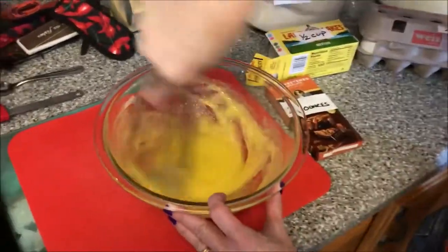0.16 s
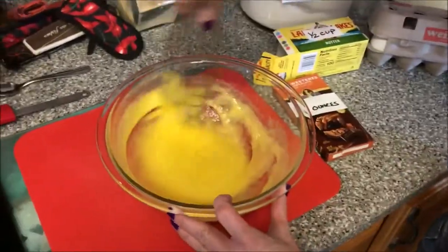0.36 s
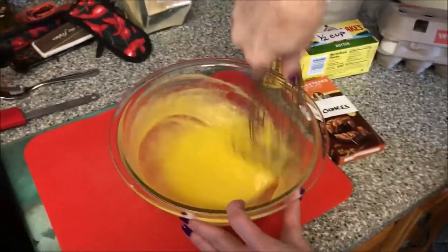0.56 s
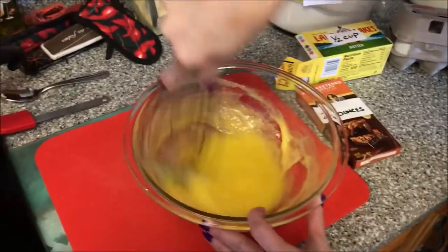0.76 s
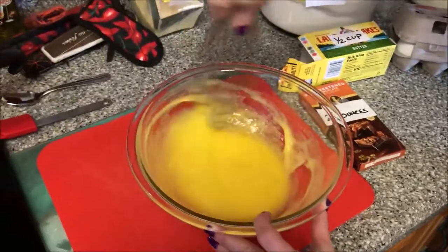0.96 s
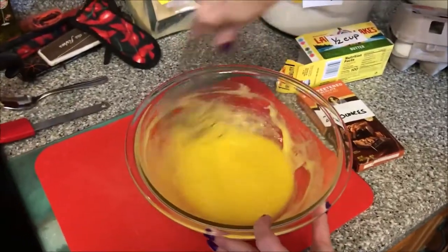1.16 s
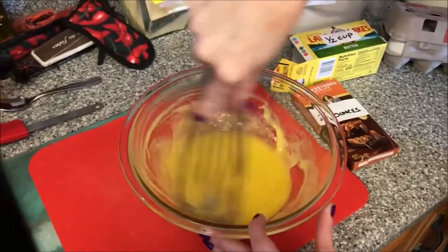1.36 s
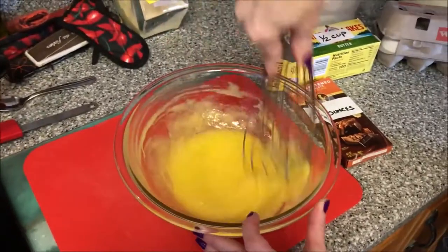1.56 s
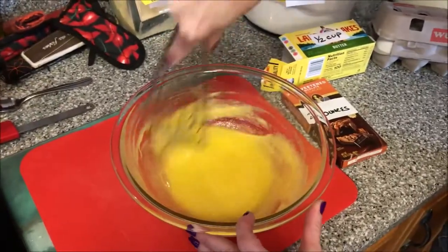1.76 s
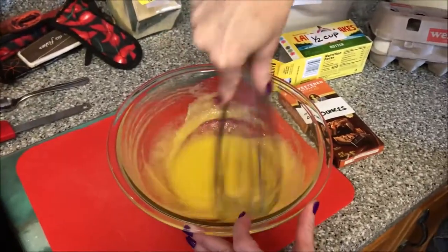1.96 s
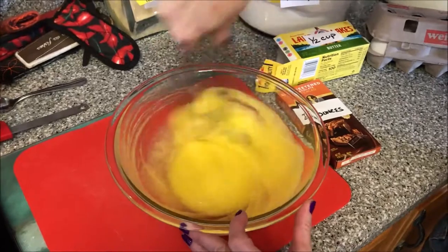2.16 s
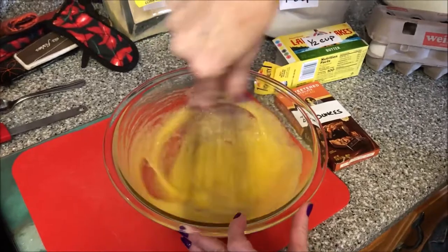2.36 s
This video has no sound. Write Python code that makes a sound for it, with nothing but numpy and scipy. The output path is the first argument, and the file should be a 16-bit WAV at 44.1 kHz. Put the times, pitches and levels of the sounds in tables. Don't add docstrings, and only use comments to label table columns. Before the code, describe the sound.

Fast whisking in a glass bowl: bright wire clinks and gritty scraping in a quiet kitchen

```python
import sys
import numpy as np
from scipy import signal
from scipy.fft import rfft, irfft
from scipy.io import wavfile
from scipy.ndimage import uniform_filter1d

SR = 44100
rng = np.random.default_rng(int(sys.argv[2]) if len(sys.argv) > 2 else 0)


def gain_from_db(level_db):
    decades = np.asarray(level_db, float) / 20
    return 10 ** decades


def unload_audio(sound):
    columns = np.transpose(np.atleast_2d(sound))
    steps = np.round(np.clip(columns, -1, 1) * 32767)
    wavfile.write(sys.argv[1], SR, steps.astype(np.int16))


N = 105840

# start_s, peak_db, then mode2_db, mode3_db, mode4_db relative to the peak
SQUARE_STRIKES = [(0.047, -27, -43, -28, -37), (0.2372, -1.5, -19.5, -20.5, -3),
                  (0.399, -22, -25.5, -18, -22), (0.5307, -10.5, -30, -10, -18.5),
                  (0.5495, -13, -29, -11, -20), (0.7209, -16.5, -28, -38, -12.5),
                  (0.9242, -18, -20, -14, -8.5), (1.0111, -26.5, -10.5, -17, -5.5),
                  (1.2012, -21, -22, -21.5, -22), (1.4743, -25.5, -20, -16, -41),
                  (1.6204, -20.5, -31, -18, -14), (1.6647, -16, -22.5, -24, -14),
                  (1.921, -25.5, -18, -41, -14), (1.9565, -26, -23, -19, -21),
                  (2.016, -27.5, -35, -40, -28), (2.1216, -25, -40, -21, -26),
                  (2.3498, -22.5, -46, -41, -31)]
GLANCING_STRIKES = [(0.07, -28, -56, -46, -27), (0.1507, -23, -27, -46, -26), (0.1764, -25.5, -17.5, -47, -18),
                    (0.4569, -31.5, -15, -20, -26), (0.506, -23, -28, -17.5, -27),
                    (0.6514, -42, -22, -21, -22), (0.6846, -21, -22, -52, -20), (0.7582, -17.5, -16, -51, -10),
                    (0.782, -12.5, -12.5, -20.5, -8), (0.841, -18.5, -17, -30, -5.5),
                    (0.8824, -23.5, -18.5, -14.5, -9), (0.9597, -26, -11, -56, -19.5),
                    (0.9844, -62, -60, -60, -1), (1.05, -30.5, -16, -11, -6), (1.0684, -26, -13.5, -20, -7),
                    (1.0949, -19.5, -16, -20, -16), (1.1608, -24.5, -17, -20, -15),
                    (1.232, -21, -22.5, -17.5, -16), (1.2657, -17.5, -16.5, -19, -17.5),
                (1.349, -26, -33, -15, -20), (1.3746, -22.5, -21, -24, -10.5),
                (1.3904, -27.5, -39, -4.5, -23), (1.415, -24, -36, -21, -11), (1.525, -33, -11, -34, -7),
                (1.585, -25, -28, -34, -48), (1.6902, -19, -21, -20.5, -12),
                (1.741, -23.5, -15.5, -19, -19), (1.8466, -35.5, -37, -45, -8), (1.872, -20, -43, -41, -21),
                (2.044, -24, -30, -45, -37), (2.141, -19, -53, -47, -54), (2.1705, -30.5, -17, -30, -36),
                (2.2548, -33.5, -14, -10.5, -28)]
# pitch_hz, struck_db, scraped_db, t60_s, pair_split_hz
BOWL_MODES = [(538, -37, -13.5, 0.47, 19.5), (1413.5, 2.5, -8, 0.2, 21.5), (2627, 2, -12.5, 0.21, 35.5),
              (4057, 2, -6.5, 0.091, -58.5), (3054, -22, -15, 0.12, 64), (3556, -22.5, -12, 0.073, 67),
              (5718, -16.5, -7.5, 0.083, 49.5),
              (7450, -19, -14, .05, 70), (8140, -19, -14, .06, 40), (8690, -22, -15, .05, 60),
               (9455, -16, -11, .06, 50), (11440, -21, -19, .03, 100)]
# time_s, level_db
BARE_GLASS = [(0, -3), (.6, 1), (.8, 0.5), (1.4, 3), (1.9, 2.5), (2.1, -4), (2.4, -2)]
# time_s, level_db
PRESSURE = [(0.0, -39.5), (0.58, -41.5), (0.75, -33), (0.87, -38), (1.28, -43.5), (1.44, -41),
            (1.65, -38.5), (1.78, -39), (2.11, -39), (2.22, -33.5), (2.29, -38.5), (2.4, -35)]
# frequency_hz, density_db (per Hz)
TICK_COLOUR = [(70, -30), (250, -15), (600, -6), (1200, 0.5), (2000, -5), (3300, 0), (7000, -4),
               (11000, -5.5), (16000, -9)]
# pitch_hz, level_db, t60_s
WIRE_MODES = [(1204, -10, 0.026), (3320, 4, 0.042), (5470, -2.5, .025), (7000, 8, 0.045),
              (9250, -0.5, 0.013)]
# time_s, level_db
SKIM_LEVEL = [(0, -63), (.08, -56.5), (.16, -42), (.23, -39.5), (.35, -67.5), (1.9, -58), (2.1, -50.5),
              (2.4, -55)]
# start_s, pitch_hz, peak_db, decay_s
PINGS = [(.0485, 3690, -33, 0.0033), (0.049, 4900, -38, .002), (0.0497, 8070, -31, .002),
         (.2225, 5800, -32.5, 0.0045), (.2235, 7460, -40, 0.0031), (.2235, 3000, -42, 0.0037),
         (.222, 12800, -40, .005), (.244, 4046, -9, 0.0073), (0.238, 2960, -19, 0.0035),
         (0.248, 9400, -27, 0.0042), (.239, 2020, -34, 0.0048), (0.297, 9150, -43, .01),
         (.297, 5760, -40, 0.01), (.295, 7480, -46, 0.065), (0.313, 9400, -36.5, 0.01),
         (0.296, 3175, -51, 0.018), (0.294, 1257, -46, 0.022), (.5495, 8120, -23, .005),
         (.532, 5380, -23, .005), (.5495, 3500, -23.5, .004), (.532, 3900, -19, 0.0038),
         (0.7186, 5710, -30.5, 0.014), (1.0111, 11400, -33.5, .004), (1.0111, 6600, -37, .003),
         (1.318, 2900, -39.5, 0.014), (1.318, 3620, -38, 0.013), (1.335, 3240, -41, 0.014),
         (1.342, 8740, -32, 0.0091), (1.342, 7450, -37, .008), (1.374, 5710, -34, 0.038),
         (1.376, 2035, -40, 0.021), (1.375, 3030, -41, .03), (1.376, 3420, -48, 0.027),
         (1.379, 8180, -42, 0.033), (1.382, 9450, -31, 0.018), (1.521, 3070, -38, 0.02),
         (1.6656, 8150, -31.5, 0.013), (1.781, 4070, -44, 0.076), (1.623, 2615, -38.5, .04),
         (1.69, 5710, -34, 0.028), (2.351, 9000, -41, .003)]
# start_s, pitch_hz, peak_db, decay_s
KNOCKS = [(0.337, 129, -36.5, 0.015), (.34, 81.5, -39.5, 0.0204), (.24, 149, -40.5, .015),
          (0.529, 218, -45, 0.025), (1.375, 828, -44, 0.034), (1.38, 1075, -35.5, 0.023),
          (1.517, 848, -41, 0.018), (1.922, 1117, -37, 0.015), (1.957, 1110, -38, 0.0096),
          (2.016, 1160, -35.5, 0.0052), (2.045, 1555, -33.5, 0.0055), (2.349, 5200, -30.5, 0.0032),
          (2.144, 7250, -33, 0.0043)]
# centre_s, length_s, depth_db
LIFTS = [(0.375, .03, -2), (0.619, 0.044, -7.5), (2.7, 0.037, -10), (2.325, 0.032, -7), (1.57, 0.014, -2)]
# centre_s, length_s, depth_db
BRIEF_DIPS = [(.31, .03, -34), (1.334, .026, -34), (.105, .022, -12), (.217, .02, -16), (.876, .016, -14),
              (1.025, .018, -11), (1.537, .014, -12), (.172, .012, -10), (1.389, .01, -12),
              (.2325, .006, -14), (.683, .014, -9), (1.153, .014, -9)]
# frequency_hz, density_db (per Hz)
ROOM_COLOUR = [(33, -40), (40, -18), (54, -1.5), (291, 1), (319, -24), (492, -7), (531, -44), (592, 0.5),
               (1000, -22), (1300, -43), (2200, -120)]

WIRES = 5
HELD_TOP_HZ = 9800


def curve(table):
    a = np.array(table)
    return np.interp(np.arange(N) / SR, a[:, 0], a[:, 1])


def unit(x):
    return x / np.sqrt(np.mean(x ** 2))


def spectrum_db(hz, table):
    a = np.array(table)
    return np.interp(np.log(hz), np.log(a[:, 0]), a[:, 1])


def colour(x, table):
    hz = np.arange(N // 2 + 1) * SR / N + 1
    return unit(irfft(rfft(x) * gain_from_db(spectrum_db(hz, table)), N))


def fade(x, tau, hz=0):
    return signal.lfilter([1], [1, -np.exp(2j * np.pi * hz / SR - 1 / (tau * SR))], x)


def walk(rate):
    k = int(SR / rate)
    steps = np.repeat(rng.standard_normal(N // k + 1), k)
    return unit(uniform_filter1d(steps, k)[:N])


def impulses(times, sizes):
    x = np.zeros(N, complex)
    np.add.at(x, np.clip((times * SR).astype(int), 0, N - 1), sizes)
    return x


def dip_db(centre_s, length_s, depth_db):
    t = np.arange(N) / SR
    return depth_db * np.exp(-((t - centre_s) / length_s * 2) ** 4)


def wires(table, spread_s, early_s, fall_db):
    hits = np.repeat(np.array(table, float), WIRES, axis=0)
    luck = rng.random((len(table), WIRES, 2))
    turn = np.arange(WIRES)
    jitter = np.sign(turn) * (luck[..., 0] - .5)
    hits[:, 0] += (spread_s * (turn + jitter) / WIRES).ravel() - early_s
    hits[:, 1] += (4 * luck[..., 1] - 8 + fall_db * turn).ravel()
    return hits


def bowl(hits, grit):
    rise_s, struck_damp, linger_db, scatter_db = 0.0012, 0.61, -17, 2.5
    modes = BOWL_MODES
    struck, scraped = 0, 0
    luck = rng.random((len(hits), len(modes), 3))
    luck[..., 0] = np.repeat(luck[::WIRES, :, 0], WIRES, axis=0)
    start, peak_db = hits[:, 0], hits[:, 1]
    glass_db = curve(BARE_GLASS)
    bare_db = glass_db[(start * SR).astype(int)]
    for k, (hz, hit_db, scrape_db, t60, split_hz) in enumerate(modes):
        if 1 <= k <= 3:
            place_db = hits[:, k + 1]
        else:
            place_db = scatter_db * (4 * luck[:, k, 0] - 2) + bare_db
        if k == 6:
            place_db = .5 * (place_db + hits[:, 4] + 14)
        phase = 2.5 * luck[:, k, 1] + 2 * np.pi * (hz * start + luck[:, k, 0])
        size = gain_from_db(peak_db + place_db + hit_db) * np.exp(1j * phase)
        tau = t60 / np.log(1000)
        weak_share = 0.14 * np.exp(1.5j * (luck[:, k, 2] - .5))
        for side, share in ((-.5, 0.5), (.5, weak_share)):
            f = hz + side * split_hz
            push = fade(impulses(start, size * share), rise_s, f) / (rise_s * SR)
            ring = fade(push, tau * struck_damp, f) + gain_from_db(linger_db) * fade(push, tau * 2, f)
            struck = struck + ring.imag
            flicker_db = 2.9 * walk(25.03) if k < 4 else 4.5 * walk(30.18) + glass_db
            fed = fade(grit * gain_from_db(flicker_db), tau, f).imag
            scraped = scraped + gain_from_db(scrape_db) * unit(fed)
    return struck, unit(scraped)


def cracks(hits):
    crack_db, crack_s, tail_db, tail_s = -13.5, 0.0015, -12.5, 0.03
    x = fade(impulses(hits[:, 0], gain_from_db(hits[:, 1] + crack_db)), 0.00045) / (0.00065 * SR)
    env = (fade(x, crack_s) + gain_from_db(tail_db) * fade(x, tail_s)).real
    return env * colour(rng.standard_normal(N), TICK_COLOUR)


def drag():
    ticks_per_s, spread_db, smear_s = 600, 2.2, 0.0018
    ticks = (rng.random(N) < ticks_per_s / SR) * gain_from_db(spread_db * rng.exponential(size=N))
    grit = fade(ticks, smear_s).real * rng.standard_normal(N)
    return unit(grit * gain_from_db(2 * walk(40) + 1 * walk(12)))


def patchy(x):
    spec, out = rfft(x), 0
    hz = np.arange(len(spec)) * SR / N
    band = np.log2(hz / 700 + 1e-3).clip(0, 4.5) * 4
    for k in range(19):
        weight = (1 - abs(band - k)).clip(0)
        out = out + irfft(spec * weight, N) * gain_from_db(2.8 * walk(60))
    return out


def rattle():
    clicks_per_s, ring_cycles = 240, 5.4
    out, pitches = 0, np.geomspace(1000, 10500, num=16)
    for hz in pitches:
        clicks = rng.random(N) < clicks_per_s / len(pitches) / SR
        x = clicks * gain_from_db(2 * rng.exponential(size=N))
        out = out + fade(x, ring_cycles / hz, hz).imag * gain_from_db(spectrum_db(hz, TICK_COLOUR))
    return unit(out)


def skim(grit):
    hum = 0
    for hz, db, t60 in WIRE_MODES:
        hum = hum + gain_from_db(db) * unit(fade(grit, t60 / np.log(1000), hz).imag)
    return gain_from_db(curve(SKIM_LEVEL)) * unit(hum)


def knocks():
    t, out = np.arange(N) / SR, 0
    for start, hz, db, tau in KNOCKS + PINGS:
        since = t - start
        rise = np.clip(since / max(2 / hz, 0.2 * tau), 0, 1)
        decay = np.exp(-np.clip(since, 0, 9) / tau)
        out = out + gain_from_db(db) * np.sin(2 * np.pi * hz * since) * decay * rise
    return out


def held(x):
    count, frame, level_db = 9, 1024, 5.5
    t, out = np.arange(N) / SR, 0
    for centre, length, depth_db in BRIEF_DIPS:
        end = int((centre - length / 2) * SR)
        size = abs(rfft(x[end - frame:end] * np.hanning(frame))) * 4 / frame
        hz = np.arange(len(size)) * SR / frame
        tilt = size * np.sqrt(hz) * (hz < HELD_TOP_HZ)
        tops = signal.find_peaks(tilt, distance=9)[0]
        tops = tops[np.argsort(-tilt[tops])[:count]]
        tones = sum(size[k] * np.sin(2 * np.pi * hz[k] * t + k) for k in tops)
        out = out + (1 - gain_from_db(dip_db(centre, length, depth_db))) * tones
    return out * gain_from_db(level_db)


def room():
    room_db, hum_hz, hum_db = -55.5, 59.7, -58.5
    phase = 2 * np.pi * hum_hz * np.arange(N) / SR + 1.5 * walk(18)
    hum = np.sin(phase) * gain_from_db(hum_db + 2.5 * walk(14))
    air = colour(rng.standard_normal(N), ROOM_COLOUR + [(2500, -13)])
    return air * gain_from_db(room_db + 2.0 * walk(12.0)), hum


def scene():
    drag_db, drag_ring_db, rattle_db = -8.5, -8.5, -14
    square = wires(SQUARE_STRIKES, spread_s=.004, early_s=0, fall_db=-2)
    glancing = wires(GLANCING_STRIKES, spread_s=.013, early_s=.006, fall_db=0.3)
    hits = np.vstack([square, glancing])
    grit, press = drag(), gain_from_db(curve(PRESSURE))
    duck = gain_from_db(sum(dip_db(*row) for row in BRIEF_DIPS + LIFTS))

    struck, scraped = bowl(hits, grit * duck ** .5)
    rings = struck + press * gain_from_db(drag_ring_db + curve(BARE_GLASS)) * scraped
    air, hum = room()
    scrape = patchy(cracks(hits) + press * gain_from_db(drag_db) * colour(grit, TICK_COLOUR))
    noisy = scrape + press * gain_from_db(rattle_db) * rattle() + air + skim(grit)

    high_pass = signal.butter(6, HELD_TOP_HZ, "high", fs=SR, output="sos")
    shrill = signal.sosfiltfilt(high_pass, rings)
    return (duck * noisy + held(noisy) + rings - (1 - duck) * shrill + hum + knocks())[None]


def top_cut(x):
    return signal.sosfilt(signal.butter(12, 16510, fs=SR, output="sos"), x)


def record(dry):
    low_pass = signal.ellip(8, .5, 60, 15550, fs=SR, output="sos")
    mix = signal.sosfilt(low_pass, dry)
    return top_cut(mix)


dry = scene()
out = record(dry)
unload_audio(out)
```